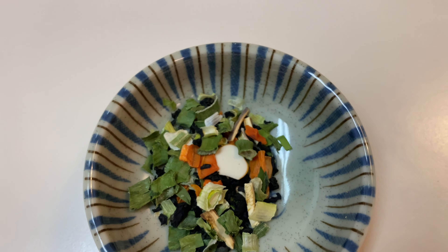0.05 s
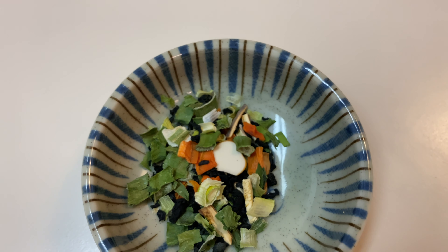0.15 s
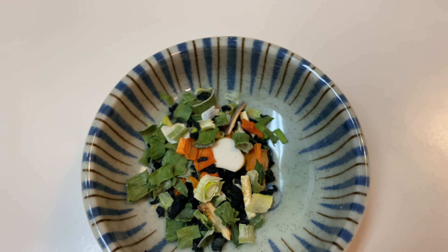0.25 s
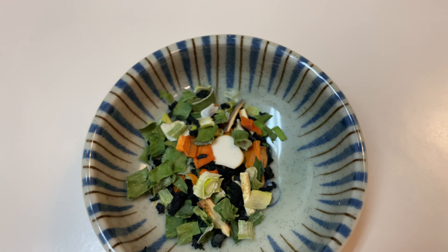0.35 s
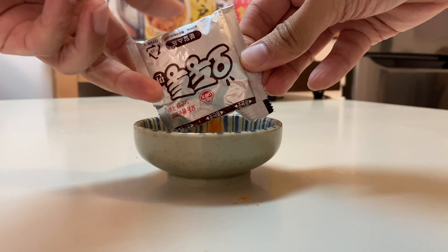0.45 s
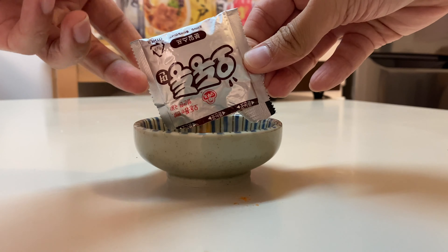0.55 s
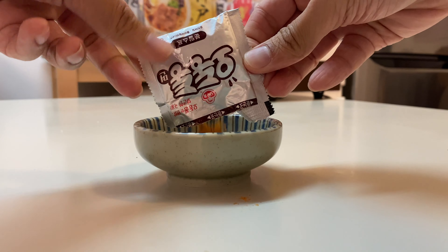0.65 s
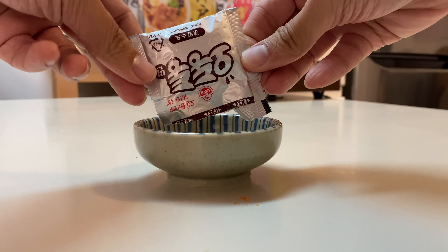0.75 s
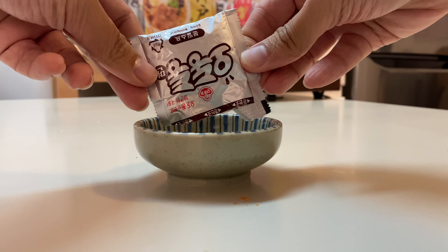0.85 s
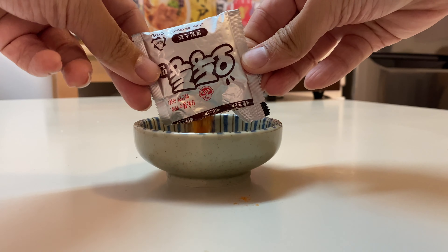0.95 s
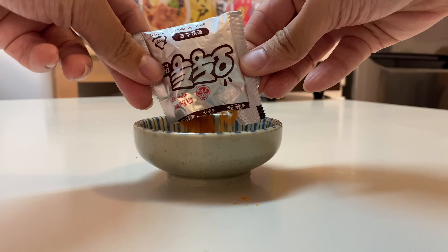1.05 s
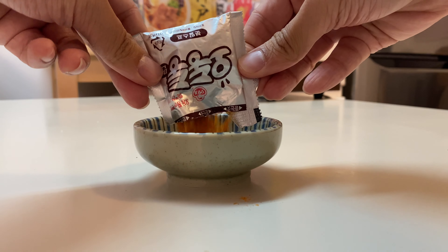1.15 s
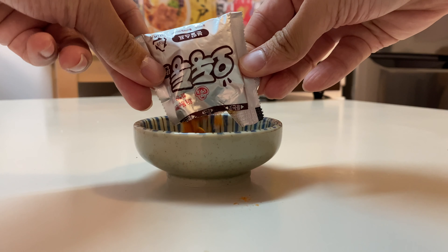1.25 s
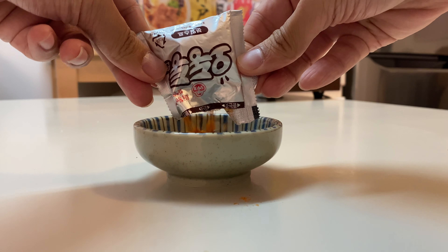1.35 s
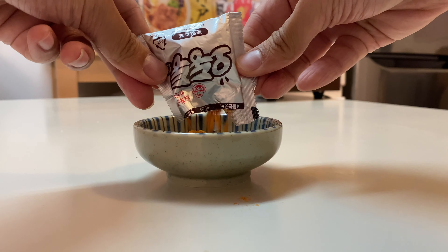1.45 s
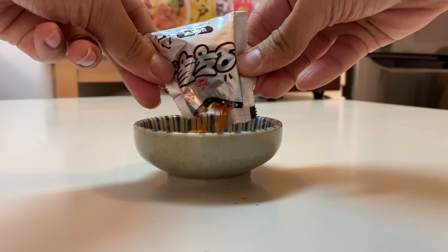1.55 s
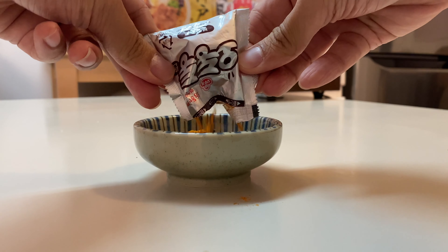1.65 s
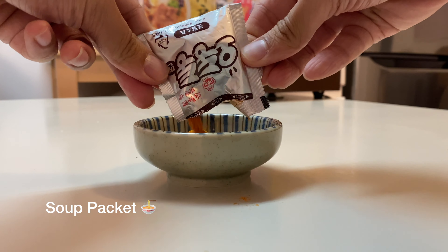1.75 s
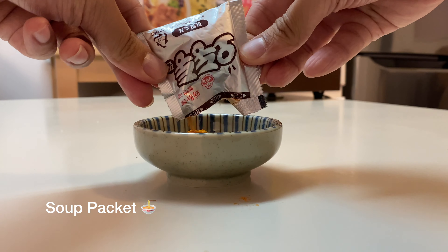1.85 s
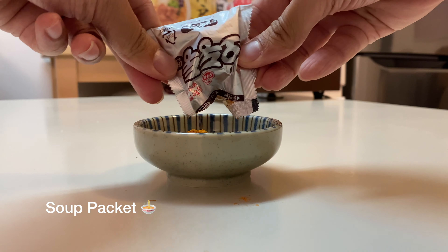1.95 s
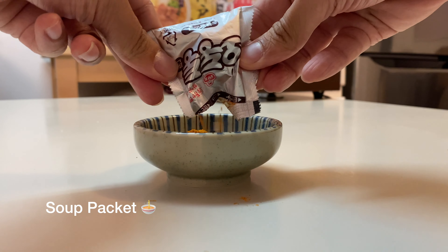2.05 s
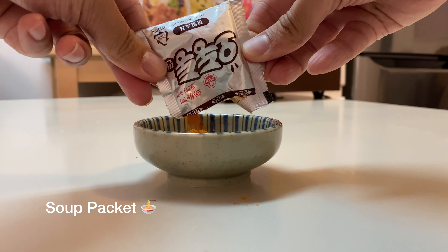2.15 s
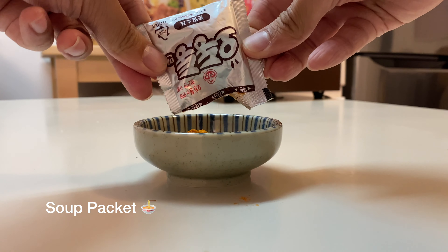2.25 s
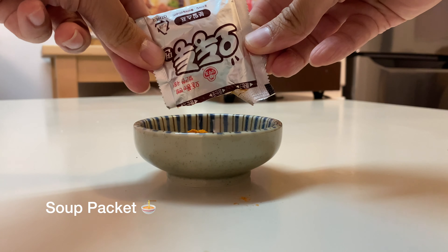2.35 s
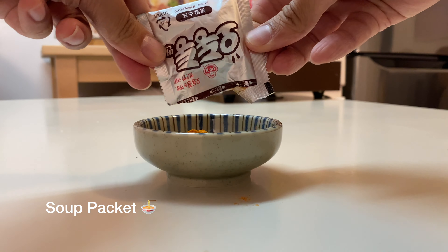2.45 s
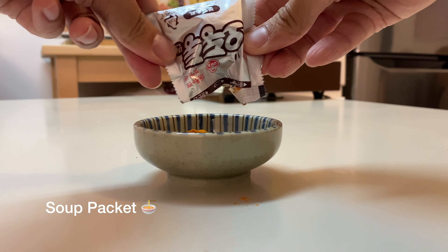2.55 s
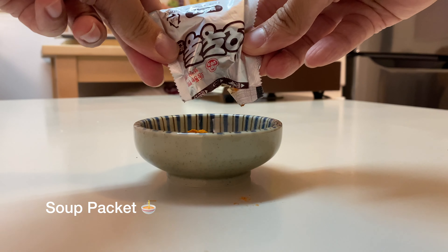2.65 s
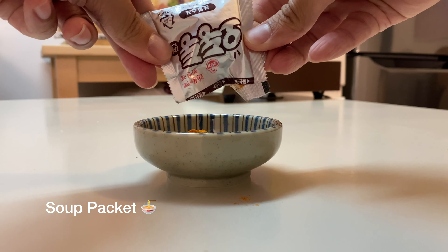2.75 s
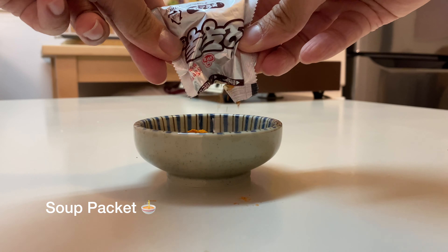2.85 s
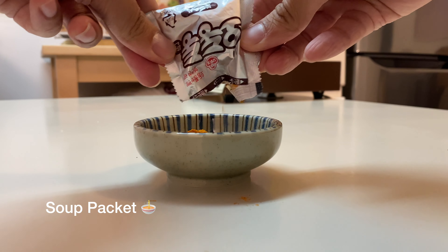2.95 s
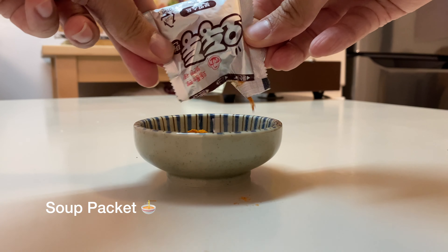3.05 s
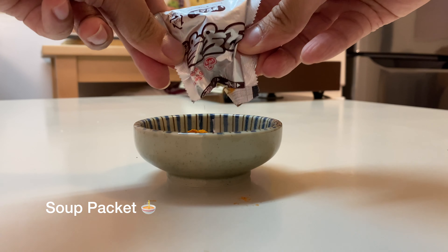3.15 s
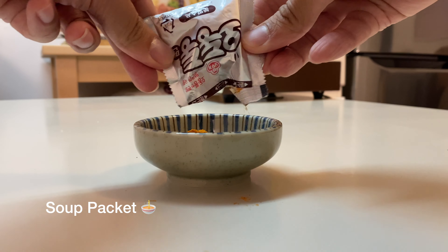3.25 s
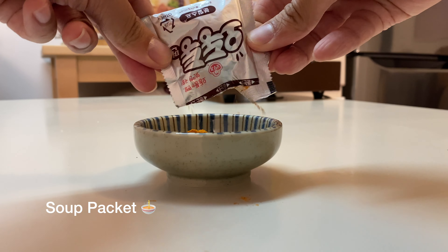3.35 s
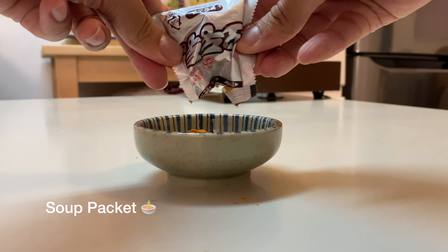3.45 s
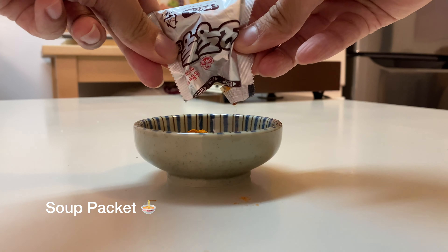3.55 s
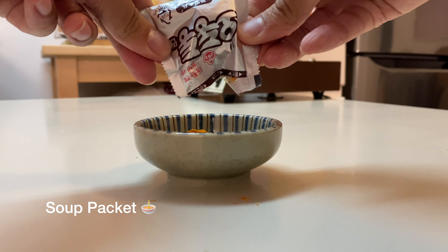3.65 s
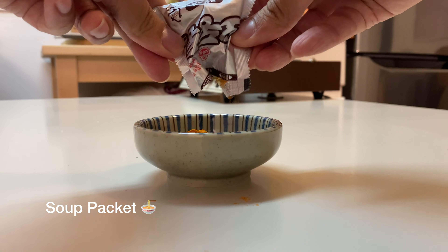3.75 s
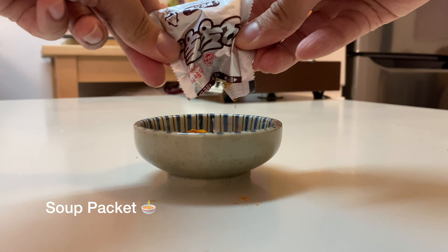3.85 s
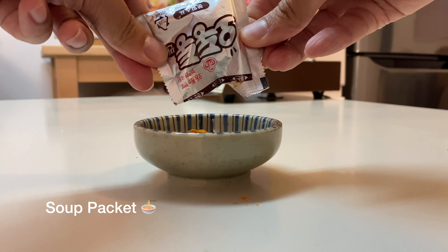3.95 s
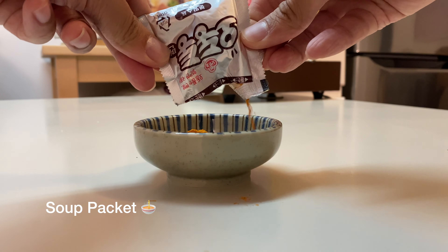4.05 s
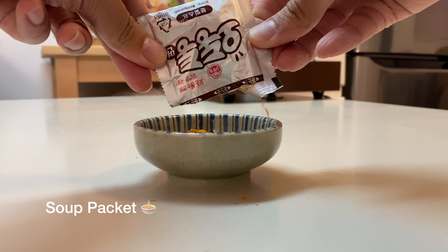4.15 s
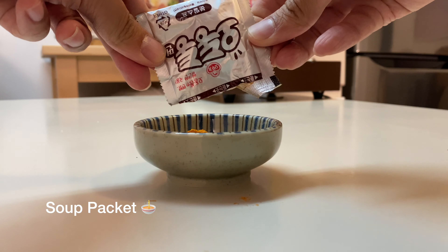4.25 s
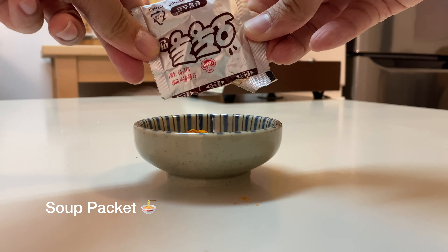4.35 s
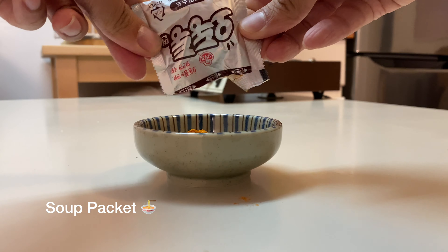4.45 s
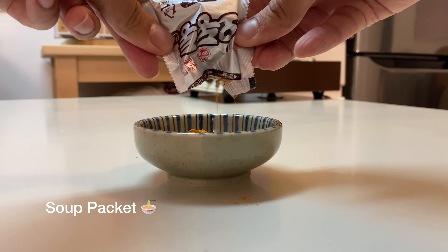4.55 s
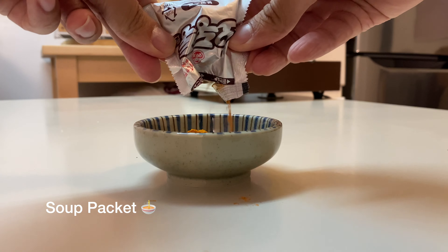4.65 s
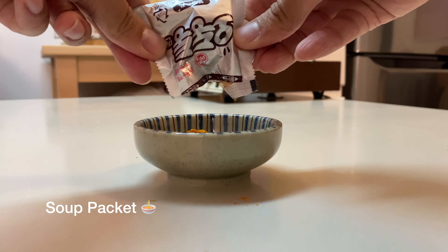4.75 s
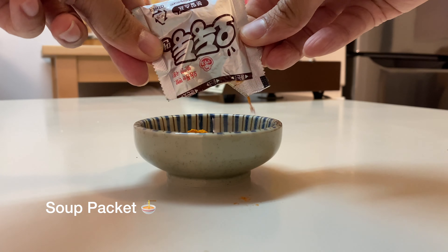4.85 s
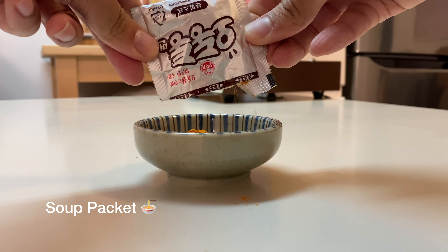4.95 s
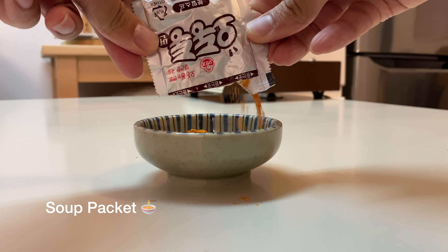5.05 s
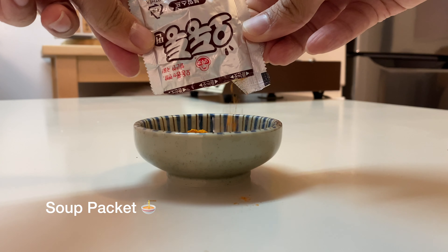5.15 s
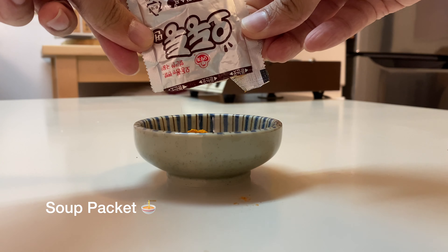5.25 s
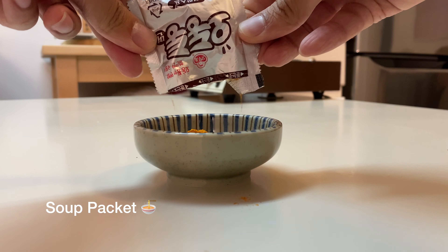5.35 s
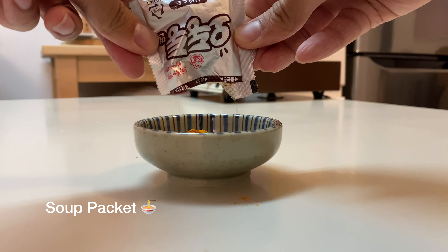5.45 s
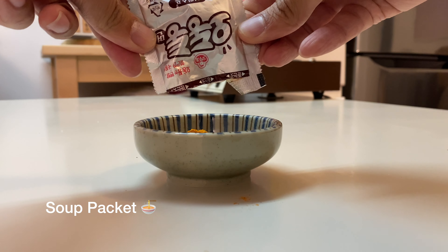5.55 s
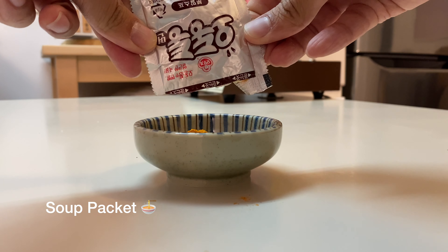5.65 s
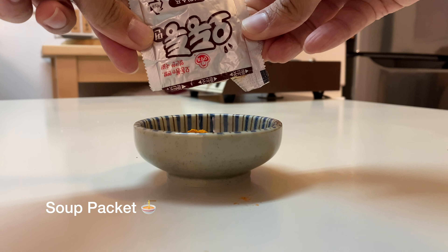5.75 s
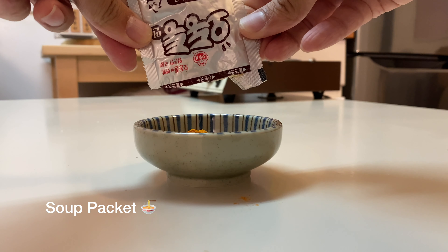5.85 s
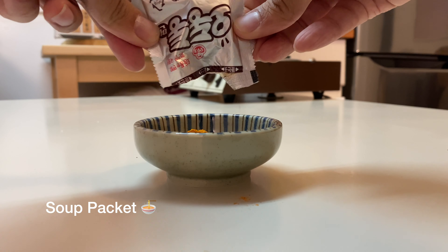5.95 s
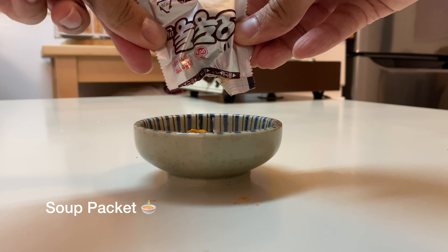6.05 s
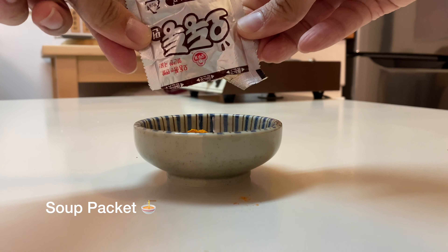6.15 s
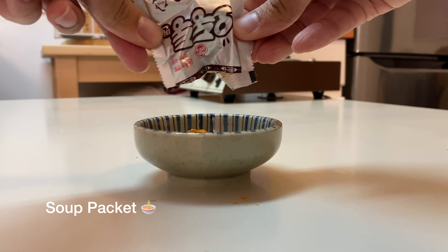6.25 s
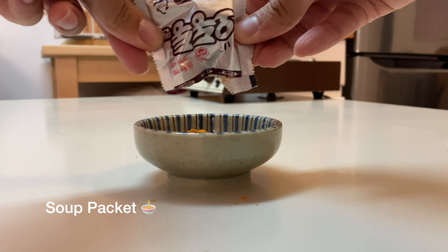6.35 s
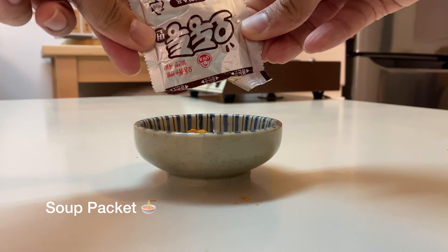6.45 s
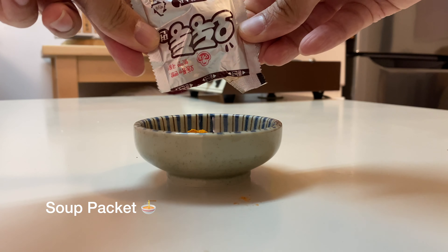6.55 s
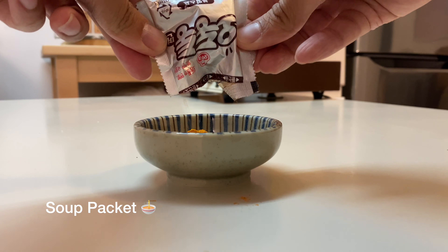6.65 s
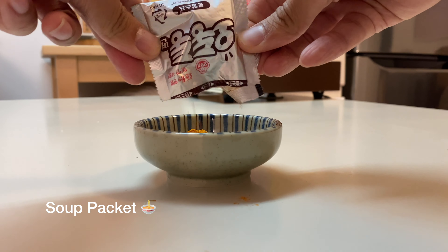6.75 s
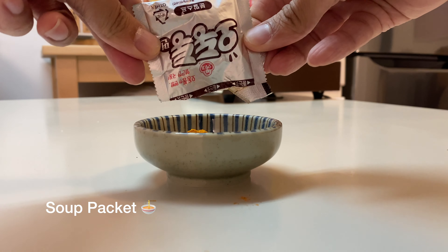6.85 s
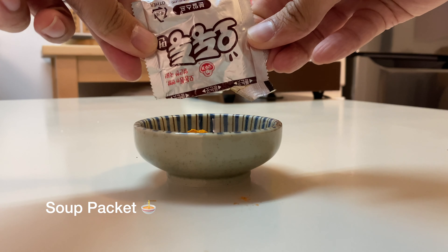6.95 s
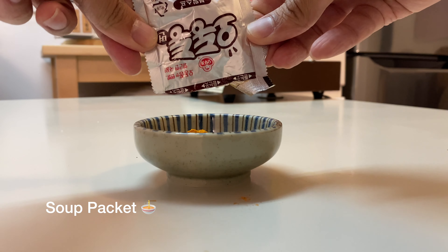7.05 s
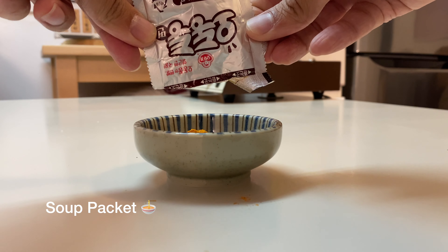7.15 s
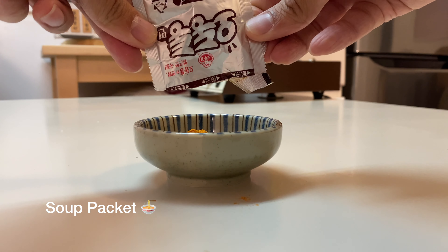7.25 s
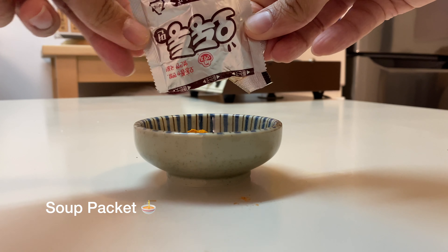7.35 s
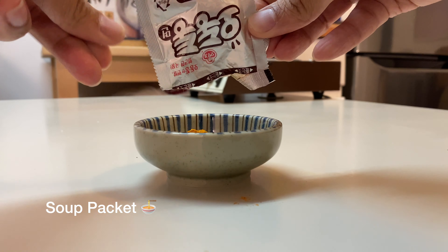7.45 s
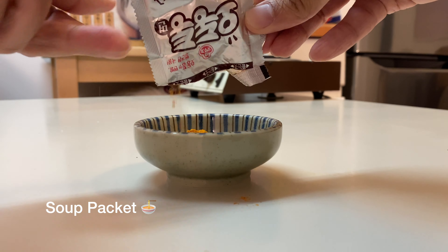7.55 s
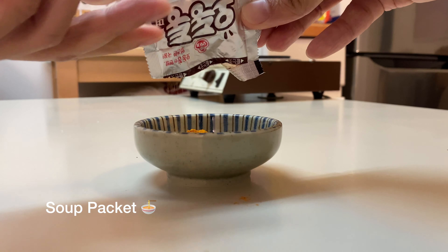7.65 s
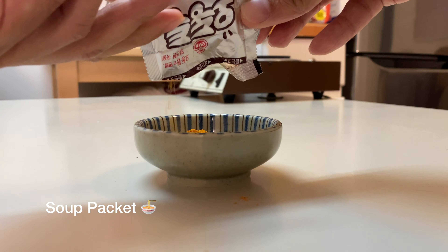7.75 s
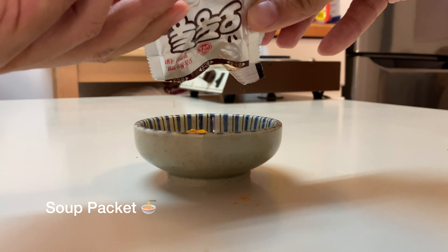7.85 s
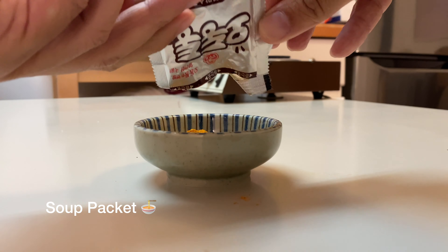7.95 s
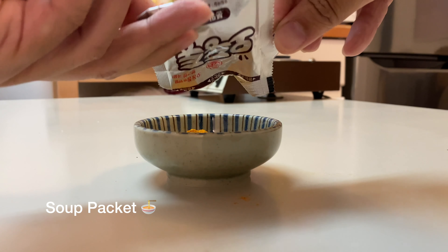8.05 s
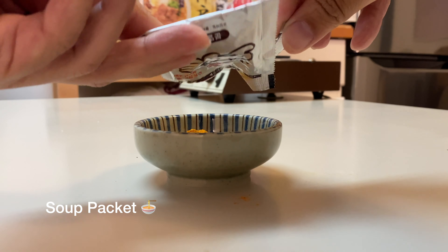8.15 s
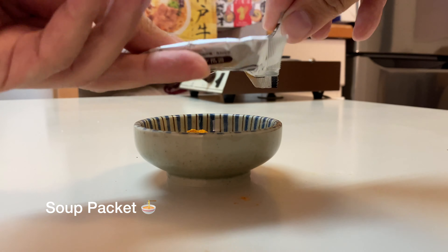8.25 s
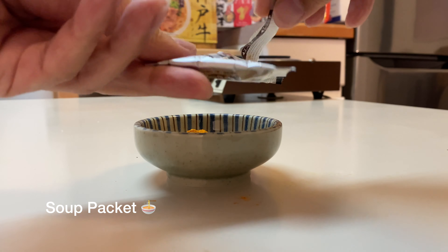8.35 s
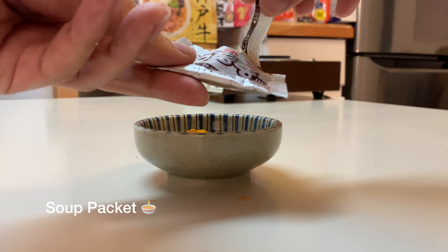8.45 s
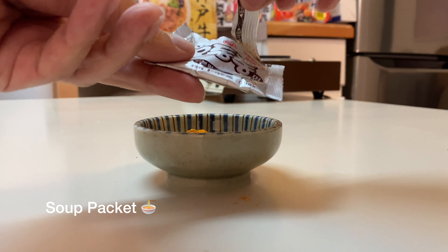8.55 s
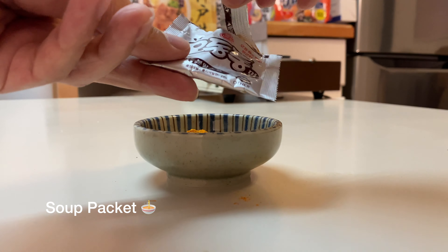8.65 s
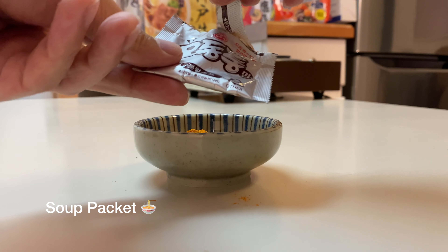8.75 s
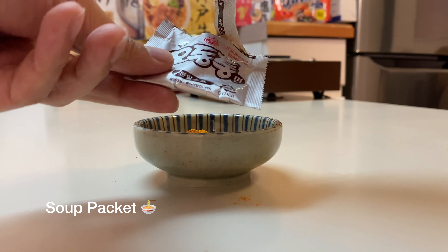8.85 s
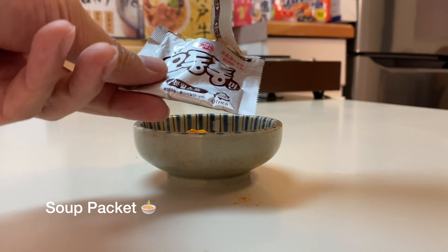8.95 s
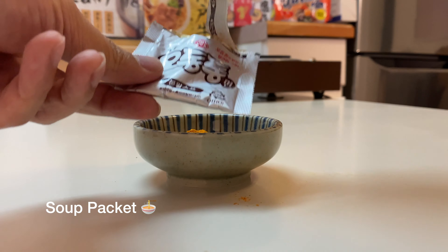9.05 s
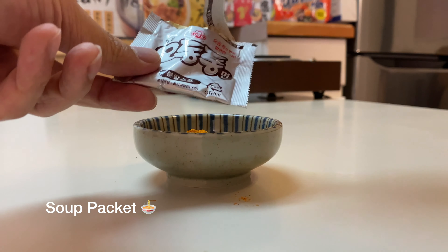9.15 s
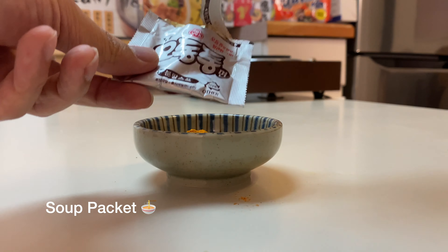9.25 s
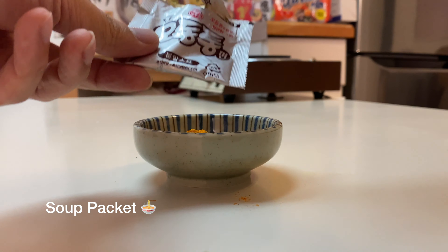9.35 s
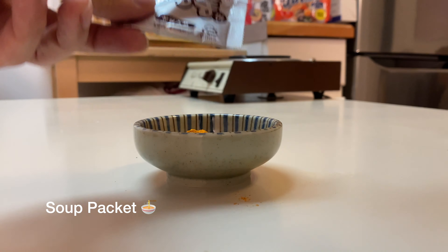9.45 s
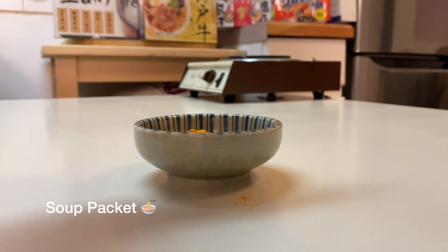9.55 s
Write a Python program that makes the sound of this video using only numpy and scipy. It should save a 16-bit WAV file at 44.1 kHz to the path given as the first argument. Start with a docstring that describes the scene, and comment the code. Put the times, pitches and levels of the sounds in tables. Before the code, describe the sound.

A faint appliance hum and a dull tick come first. Then a small foil-plastic seasoning sachet is squeezed and shaken close to the microphone, its creases crackling and snapping in uneven clusters. Powder and fingertips rustle on the film, and the pouch thumps softly as it pops in and out. Near the end the crinkling thins to a few weaker crackles. The kitchen adds a brief echo.

```python
"""First come a faint appliance hum and a dull tick, then sharp snaps: a foil-plastic seasoning sachet is
squeezed and shaken over a small dish. Its creases buckle and set the film ringing, and the tiled kitchen
answers briefly. Powder and fingertips rustle on the film, and the pouch thumps softly as it pops in or out.
Two microphone ports on a phone hear it with different colour and timing."""
import sys
import numpy as np
from scipy import signal
from scipy.fft import rfft, irfft, next_fast_len
from scipy.io import wavfile
from scipy.ndimage import map_coordinates

SR = 44100
rng = np.random.default_rng(int(sys.argv[2]) if len(sys.argv) > 2 else 0)


def output_pcm(signal):
    """Save a mono or channel-first signal as 16-bit PCM at the path in sys.argv[1].

    Samples are clipped to [-1, 1] before scaling.
    """
    pcm = np.clip(np.atleast_2d(signal).T, -1, 1) * 32767
    wavfile.write(sys.argv[1], SR, np.round(pcm).astype(np.int16))


N = 423360  # 9.6 s


def amp(db):
    """Turn decibels into a multiplier."""
    return 10 ** (np.asarray(db) / 20)


def unit(x):
    """Scale each channel to an average power of 1."""
    return x / np.sqrt(np.mean(x ** 2, axis=-1, keepdims=True) + 1e-20)


def along(points, hz):
    """Read between (frequency, value) points on a logarithmic frequency scale."""
    f, values = np.transpose(points)
    return np.interp(np.log(hz + 1), np.log(f + 1), values)


def curves(rows):
    """Turn each column after the time into one value per sample."""
    times, *columns = np.transpose(rows)
    return [np.interp(np.arange(N) / SR, times, column) for column in columns]


def filtered(x, response):
    """Scale and delay each frequency of x as response(hz) says."""
    size = next_fast_len(2 * x.shape[-1])
    return irfft(rfft(x, size) * response(np.fft.rfftfreq(size, 1 / SR)), size)[..., :x.shape[-1]]


def ringing(modes):
    """A filter that rings at each (f/Hz, width/Hz, level/dB)."""
    return lambda f: sum((-1) ** k * amp(db) * 1j * f * width / (hz * hz - f * f + 1j * f * width)
                         for k, (hz, width, db) in enumerate(modes))


def coloured(spectrum, channels):
    """Noise of power 1, shaped by (f/Hz, level/dB) points."""
    return unit(filtered(rng.standard_normal((channels, N)), lambda hz: amp(along(spectrum, hz))))


def wobble(rate):
    """A smooth curve through `rate` random values a second."""
    return map_coordinates(rng.standard_normal(int(N * rate / SR) + 4), [np.arange(N) * rate / SR])


def placed(seconds, sounds):
    """Add each row of sound at its start time."""
    at = np.round(seconds * SR).astype(int) + np.arange(sounds.shape[1])
    return np.bincount(at.ravel(), sounds.ravel(), N + sounds.shape[1])[:N]


# How loud the background sounds as the phone's automatic gain dips and rises:
# t/s, room tone level/dB, rumble level/dB
BACKGROUND_LEVELS = [(0.0, -72.5, -75.5), (0.46, -69.5, -68.5), (0.48, -76, -80), (1.4, -74, -79.5),
                     (3.2, -71, -85), (4.7, -68.5, -78.5), (5.3, -61, -70.5), (6.4, -61, -68),
                     (7.2, -64.5, -71.5), (8.9, -63.5, -70), (9.6, -70, -68.5)]
ROOM_TONE_COLOUR = [(80, -22), (140, -2.5), (210, -4.5), (300, -6), (470, -8.5), (530, -13), (640, -9.5),
                    (760, -23), (1100, -40), (1500, -79.5)]  # the room's low murmur: f/Hz, relative level/dB
RUMBLE_COLOUR = [(15, -40.5), (30, -10), (60, 0), (100, -3), (170, -43.5)]  # its deepest noise: f/Hz, relative level/dB
STEREO_LIKENESS = [(60, 0.93), (300, 0.16), (700, 0.12)]  # how alike left and right are: f/Hz, likeness (1 = the same)
HUM_NOTES = [(237, -72.5), (479, -82.5)]  # the appliance: f/Hz, level/dB when the room tone is at -68.5 dB
HISS_COLOUR = [(500, -30.5), (900, 3), (3000, -11), (9000, -17), (12500, -22.5), (14000, -33.5)]  # microphone hiss: f/Hz, relative level/dB


def kitchen():
    """An appliance hums over low room tone, rumble and microphone hiss."""
    t = np.arange(N) / SR
    tone_db, rumble_db = curves(BACKGROUND_LEVELS)
    air = amp(tone_db + 2.1 * wobble(6.8)) * coloured(ROOM_TONE_COLOUR, channels=2)
    air += amp(rumble_db + 1.3 * wobble(4)) * coloured(RUMBLE_COLOUR, channels=2)
    spread = lambda hz: np.arccos(along(STEREO_LIKENESS, hz)) / 2
    shared, opposed = filtered(air, lambda hz: np.array([np.cos(spread(hz)), np.sin(spread(hz))]))
    swell_db = 0.58 * (tone_db + 68.5)  # the hum rises and falls with the room tone
    hum = sum(amp(db + swell_db + 2 * wobble(2.3)) * np.sin(2 * np.pi * hz * t + .6 * wobble(2.7))
              for hz, db in HUM_NOTES)
    background = (np.array([shared + opposed, shared - opposed]) + hum) * amp([[1.2], [-1.2]])
    return background + amp(-79) * coloured(HISS_COLOUR, channels=2)


# A faint, dull tick at the start, then the sachet's creases snapping:
# t/s, crack level/dB, panel level/dB, panel f/Hz, pouch level/dB.
# A panel is a flat patch of film. Panel and pouch levels are relative: they follow the crack's.
TICK_AND_SNAPS = [(0.0497, -72.5, 28, 900, 11), (0.4812, -50.5, -9, 1440, -11),
                  (0.5406, -49, -10, 1680, -15), (0.5619, -48.5, 1, 1750, -15),
                  (0.58, -49, -1.5, 1440, -14), (0.7243, -64.5, 7, 1180, -5),
                  (0.749, -52.5, -7.5, 930, -10.5), (0.7853, -51, -3, 2370, -9.5),
                  (0.9806, -23.5, 9.5, 2120, -6.5), (0.9956, -24, 9, 2110, -9.5),
                  (1.0279, -13, -15.5, 1720, -28.5), (1.0559, -27, 11.5, 2140, -7),
                  (1.2019, -46, 1, 980, -15), (1.2367, -52.5, -4, 960, -16), (1.273, -56.5, -8, 2310, -16),
                  (1.4351, -20.5, 9.5, 870, -2), (1.4539, -12, -6.5, 980, -19),
                  (1.4627, -18, -7, 830, -13.5), (1.4761, -20.5, 11.5, 960, 3.5),
                  (1.4973, -32.5, 12, 1400, -2.5), (1.5056, -24, 0, 920, -2),
                  (1.5122, -7.5, -7.5, 1220, -28), (1.5229, -22, 6, 1070, 5.5), (1.529, -30.5, 8, 1140, -5),
                  (1.5409, -26.5, 3, 1350, -10), (1.669, -24.5, 7, 1160, -14.5),
                  (1.7035, -22.5, -4.5, 2230, -22.5), (1.7727, -33, 9.5, 1090, 9.5),
                  (1.8042, -17.5, -6, 1230, -18), (1.8139, -20.5, -2, 2140, -5),
                  (1.8504, -14.5, 2, 2110, -21), (1.886, -13.5, -9.5, 2120, -24),
                  (1.8919, -21.5, 1.5, 1310, -9), (2.0716, -41.5, 13.5, 1120, -4.5),
                  (2.0971, -18, -3, 1720, -15), (2.1043, -32, -3, 1180, -8), (2.3088, -35, 14, 1020, -0.5),
                  (2.3181, -15.5, -1.5, 2380, -17), (2.3396, -15, 8, 830, -3), (2.4588, -9, -5, 1070, -6.5),
                  (2.506, -27.5, 11, 1080, -1.5), (2.5231, -21.5, 5, 990, -8.5),
                  (2.549, -14, 7.5, 1370, -21.5), (2.7, -39, 16, 1160, -4), (2.7345, -30, 10, 1280, -8),
                  (2.7796, -24.5, 3.5, 1500, -10), (2.8845, -17.5, -3.5, 1400, -14),
                  (2.8951, -20, -6, 1360, -23), (2.942, -24, 2, 1250, -2.5), (3.0898, -4, -2, 2190, -15.5),
                  (3.0969, -15.5, -3.5, 2690, -12.5), (3.2104, -13, 0.5, 2350, -2),
                  (3.217, -19.5, 1, 1080, -2.5), (3.258, -21.5, -3.5, 1290, -11.5),
                  (3.2652, -19.5, 9.5, 1080, -8.5), (3.2715, -26, 1.5, 1540, -3.5),
                  (3.3446, -15, 2, 2190, -13), (3.361, -23, -2, 2200, -15), (3.3898, -18.5, 8, 1770, -5),
                  (3.4033, -4, -16, 1670, -18.5), (3.4149, -16.5, -2.5, 1110, -16),
                  (3.5036, -35.5, 15, 1350, -2.5), (3.6023, -15.5, 1, 1280, 5),
                  (3.6739, -15.5, -13, 1410, -22), (3.6896, -16.5, 3, 2290, 2), (3.7032, -32, 8, 1300, 1.5),
                  (3.7329, -36, 6.5, 2190, 7.5), (3.828, -47.5, 21.5, 1060, 5),
                  (3.8364, -48, 21, 1460, 18.5), (3.8438, -28, -2, 1130, -9),
                  (3.8579, -27, 3.5, 1560, -13.5), (3.8725, -21, 2.5, 1000, 9.5),
                  (3.8834, -32.5, 0.5, 930, -6.5), (3.8946, -20.5, -5.5, 1060, -16),
                  (3.904, -32.5, -2, 1110, -13), (4.049, -14.5, 4.5, 1260, -9.5),
                  (4.0921, -17.5, -4.5, 1770, -8.5), (4.2915, -33, 17, 830, 12.5),
                  (4.3162, -17.5, 0, 1040, -15.5), (4.402, -25, 3, 970, -10), (4.4379, -8.5, -4, 2690, -10),
                  (4.4454, -19, 3.5, 2130, -19.5), (4.484, -21, 4, 2270, -35),
                  (4.5217, -9, -0.5, 2230, -6.5), (4.539, -25.5, 2, 2160, -12.5),
                  (4.6033, -40.5, 17, 1120, 10.5), (4.7125, -32.5, 12, 2110, 10),
                  (4.7216, -31.5, 15, 1300, 15), (4.7295, -14, 2.5, 1540, -3), (4.7498, -18, -1, 1430, -11),
                  (4.7671, -28, 1, 1220, -14.5), (4.7921, -30, 6, 1210, -12), (4.9283, -13, 0, 830, -4.5),
                  (4.9505, -3, -7.5, 1220, -7), (4.9599, -11.5, -16, 890, -15.5),
                  (5.1367, -43, 2, 960, -10), (5.2803, -6.5, -10, 2200, -31), (5.2896, -21, -17, 2530, -32),
                  (5.3289, -20.5, 4.5, 850, -7), (5.34, -29.5, 14.5, 990, 6),
                  (5.3472, -16.5, -3, 1130, -19), (5.3609, -34.5, 13, 960, 4), (5.3731, -23, 4, 1420, -7),
                  (5.385, -30, -2.5, 900, -17.5), (5.4378, -31, 11.5, 1170, -17),
                  (5.4652, -30.5, 7.5, 1020, -2.5), (5.588, -16, -4.5, 1010, -25),
                  (5.6126, -14, 2, 990, -5.5), (5.6211, -28, 6.5, 1150, -2.5),
                  (5.8663, -12.5, -6, 1130, -16.5), (5.8748, -11.5, -4.5, 1060, -18),
                  (5.8884, -20.5, -5, 1250, -4), (5.894, -20.5, 2.5, 1430, -4.5),
                  (5.91, -18, 1, 2200, -4.5), (5.9163, -19.5, -2, 1540, -5), (5.9252, -6, -6.5, 1280, -9),
                  (5.9335, -19.5, -6.5, 830, 0), (5.9516, -19, 1, 1990, -16.5),
                  (6.083, -21.5, 4, 1120, -20.5), (6.0908, -16.5, -6.5, 1340, -25),
                  (6.1042, -36.5, 5, 830, 0), (6.1123, -30.5, 8, 830, 1), (6.121, -39, 10, 1210, -1),
                  (6.1622, -26, 1, 1460, -16.5), (6.18, -24, 4.5, 1080, -20),
                  (6.1974, -16.5, 1.5, 2330, -19.5), (6.2487, -9, -7.5, 920, -15),
                  (6.2629, -8.5, -4.5, 1570, -14), (6.3143, -4.5, -13.5, 990, -23),
                  (6.3259, -19, 3, 1220, -2), (6.3496, -16, 1, 1030, -10), (6.3817, -5.5, -8.5, 890, -6),
                  (6.4889, -19.5, -2.5, 2350, -7), (6.5008, -14, -4.5, 1100, -23.5),
                  (6.5193, -19, 4.5, 1000, -16), (6.5465, -21, 5, 2160, -15),
                  (6.5554, -22, -7, 2190, -17.5), (6.5723, -16, -5.5, 2300, -15),
                  (6.5818, -7.5, -10, 980, -18), (6.6036, -15, -4.5, 1060, -8.5),
                  (6.6306, -12, -5, 1430, -25), (6.7317, -20.5, -0.5, 1810, -21),
                  (6.7431, -21.5, 0.5, 1300, -13), (6.8833, -25.5, 8.5, 830, -4),
                  (6.9234, -5, -9, 1110, -12.5), (7.1911, -38.5, -0.5, 2360, -8),
                  (7.2999, -28.5, 8, 830, 0), (7.3843, -18.5, -5, 830, -18.5), (7.3931, -31, -1, 830, -3),
                  (7.6082, -36, -13.5, 1320, -14), (7.6154, -34, 1.5, 1310, -10),
                  (7.7367, -31, -9.5, 1320, -5), (7.748, -37.5, 2, 1360, 5), (7.7576, -34, -5.5, 1310, -8),
                  (7.8591, -31, -3, 830, -8.5), (7.8914, -43, 1.5, 1240, -2), (7.991, -52.5, 0, 2690, 2),
                  (8.0337, -51, -2, 1210, -3), (8.0394, -52.5, -1, 1260, -5), (8.0593, -47.5, -1, 1200, -2),
                  (8.2417, -23.5, -13.5, 1200, -18), (8.2926, -30, -29, 850, -32),
                  (8.5441, -30, -2, 1150, -15), (8.5667, -21.5, -2, 2670, -11), (8.682, -37, 6, 1360, 4.5),
                  (8.8511, -57.5, 11, 1020, 14), (8.8694, -56, 8, 1060, 3), (8.8981, -50.5, 2, 890, 2),
                  (8.9067, -48.5, 3, 830, -5), (8.9357, -55.5, 2, 830, 10)]


def snap_list():
    """Give the tick and each snap two followers, usually weaker, as when neighbouring creases buckle."""
    leaders = np.array(TICK_AND_SNAPS, float)
    gap, crack, panel, pitch, pouch = np.moveaxis(rng.standard_normal((len(leaders), 2, 5)), -1, 0)
    wait_s = np.cumsum(.012 * np.exp(0.6 * gap), axis=1)
    shift_hz = 0.34 * leaders[:, None, 3] * np.tanh(pitch)
    changes = np.stack([wait_s, -16.5 + 5.5 * crack, 4 * panel, shift_hz, 5 * pouch], axis=-1)
    followers = leaders[:, None] + changes
    return np.vstack([leaders, followers.reshape(-1, 5)])


EDGE_RINGS = [(8620, 650, 7), (11300, 2400, -9), (15500, 900, -5.5)]  # the crease itself ringing: f/Hz, width/Hz, relative level/dB
POUCH_PITCH = [(1.4, 640), (4.9, 605), (5.6, 532), (6.4, 541), (7, 533), (9, 584)]  # the hollow pouch's note as the grip shifts: t/s, f/Hz
BURST_S, FACET_HZ = .008, 4363  # typical length of a full-strength burst; typical pitch of the crack


def snaps():
    """A dull tick, then snaps: spiky bursts that ring a tiny facet, the crease, a panel and the pouch."""
    start, db, panel_db, panel_hz, pouch_db = snap_list().T[:, :, None]
    t = np.arange(1024) / SR
    jitter, spikes = rng.standard_normal((len(start), 2, len(t))).swapaxes(0, 1)
    pitch_luck, edge_luck, length_luck = spikes[:, -3:].T[:, :, None]  # no two creases are alike
    facet_hz = FACET_HZ * np.exp(.25 * pitch_luck)
    pouch_hz = np.interp(start, *np.transpose(POUCH_PITCH)) * np.exp(0.046 * spikes[:, :1])
    edge_db = -8.5 + 5.5 * edge_luck
    length = BURST_S * np.exp(0.26 * length_luck - .02 * db)  # weaker snaps last longer
    fade = (1 - np.exp(-t / (0.016 * length))) * amp(-60 * t / np.clip(length, .002, .04))
    burst = fade * jitter * amp(2.53 * spikes)  # the crease gives way in many tiny jumps
    shove = fade * (1 + 0.072 * jitter)  # the wall moves one way, so the pouch gets one push

    # A small panel gives off no bass, and rings little above its lowest notes.
    bass_cut = lambda f: (1j * f / 420 / (1 + 1j * f / 420)) ** 2
    treble_cut = lambda f: 1 / (1 + 1j * f / (2.73 * panel_hz)) ** 2
    facet_ring = ringing([(facet_hz, 0.37 * facet_hz, 0), (5200, 4500, -6)])
    panel_ring = ringing([(panel_hz, 0.45 * panel_hz, 0), (1.906 * panel_hz, 0.28 * panel_hz, -7),
                          (0.92 * panel_hz, 0.65 * panel_hz, -8)])
    pouch_ring = ringing([(pouch_hz, 230, 0)])
    crack = filtered(burst, lambda f: bass_cut(f / 3) * facet_ring(f))
    edge = filtered(burst, ringing(EDGE_RINGS))
    panel = filtered(burst, lambda f: bass_cut(f) * panel_ring(f) * treble_cut(f))
    pouch = filtered(shove, lambda f: bass_cut(f) * pouch_ring(f) ** 2)
    parts = [(crack, -0.26), (edge, edge_db), (panel, panel_db + 0.22), (pouch, pouch_db - 4)]
    sound = sum(amp(peak_db) * part / np.abs(part).max(axis=1, keepdims=True) for part, peak_db in parts)
    return placed(start, amp(db) * sound)


ECHO_TIMES = [(200, 0.28), (1400, 0.21), (4500, 0.43), (12000, 0.14)]  # the tiled room's echo: f/Hz, t/s to fade by 60 dB


def room_echo(x):
    """Each frequency of the echo dies at its own speed; every stretch of sound gets a new tail."""
    out, step = np.zeros((2, N + SR)), 8192
    for start in range(0, N, step):
        hz, t, noise = signal.stft(rng.standard_normal((2, SR // 3)), SR, nperseg=256)
        fade = amp(-60 * t / along(ECHO_TIMES, hz)[:, None]) * np.clip(t / 0.0025, 0, 1)
        tail = signal.istft(noise * fade, SR, nperseg=256)[1]
        echo = signal.fftconvolve(x[None, start:start + step], tail / np.linalg.norm(tail[0]), axes=1)
        out[:, start:start + echo.shape[1]] += echo
    return out[:, :N]


def powder_motion():
    """The power of the moving powder: each main snap jolts it, then it settles."""
    start, db, panel_db = np.transpose(TICK_AND_SNAPS)[:3, :, None]
    t, settle_s = np.arange(SR // 4) / SR, 0.19
    jolt = amp(2 * db) + amp(2 * (db + panel_db))
    return placed(start, jolt * amp(-2 * 60 * t / settle_s))


FINGER_RUBS = [(0.44, -84.5, -81.5), (1.07, -47, -59), (1.23, -63, -75.5), (1.48, -67, -78),
               (1.65, -54.5, -58), (2.25, -66.5, -63.5), (2.54, -51, -51.5), (2.9, -57, -52),
               (3.26, -48, -49), (4.18, -69, -62), (4.51, -61.5, -56.5), (5.26, -62, -60),
               (5.46, -61, -52.5), (5.77, -69.5, -62), (6.4, -49.5, -50), (7.12, -74, -68.5),
               (7.53, -62.5, -73.5), (7.89, -64, -67.5), (8.11, -75.5, -74.5), (8.54, -68.5, -78.5),
               (8.76, -64, -65), (9.1, -74, -80)]  # fingers on the film: t/s, bright base level/dB, dull base level/dB
BRIGHT_COLOUR = [(2000, -33.5), (3200, -3), (4400, -5), (5200, -2.5), (7200, -6), (10000, -8), (14000, -12),
                 (15700, -13.5), (16300, -33)]  # the high part of the rustle: f/Hz, relative level/dB
DULL_COLOUR = [(300, -29.5), (600, 2), (1100, -1.5), (1500, -6.5), (2200, -8), (3000, -7), (4500, -39.5)]  # the low part of the rustle: f/Hz, relative level/dB


def rustle():
    """Powder and fingertips hiss on the film in small lumps, with stray crackles on top."""
    powder = powder_motion()
    bright_rub_db, dull_rub_db = curves(FINGER_RUBS)
    bright_db = 10 * np.log10(amp(2 * bright_rub_db) + amp(2 * -43.5) * powder)  # powers add up
    dull_db = 10 * np.log10(amp(2 * dull_rub_db) + amp(2 * -35.5) * powder)
    moving = np.interp(np.arange(N) / SR, [.465, .475, 8.95, 9.05], [0, 1, 1, 0])
    effort = np.clip((dull_db + 68.5) / 18, 0, 1)
    lumps = unit(amp(effort * (2.6 * wobble(54) + 1.6 * wobble(320)) + 5.2 * wobble(25)))
    bright = amp(bright_db) * coloured(BRIGHT_COLOUR, channels=1)[0]
    dull = amp(dull_db + 3) * coloured(DULL_COLOUR, channels=1)[0]
    return moving * (lumps * (bright + dull) + crackle(effort, level_db=dull_db + 5))


def crackle(effort, level_db):
    """Tiny folds tick at random, more often the harder the film is handled; each has its own pitch."""
    at = np.flatnonzero(rng.random(N) < 700 * effort / SR)  # about 700 a second at full effort
    pitch_luck, level_luck = rng.standard_normal((N // 40 + 1, 2))[at // 40].T[:, :, None]
    t = np.arange(200) / SR
    hz = np.clip(2200 * np.exp(0.52 * pitch_luck), 500, 14000)
    fade_db = -60 * t * hz / 7  # gone in seven cycles
    tick = amp(level_db[at, None] + 6 * level_luck + fade_db) * np.sin(2 * np.pi * hz * t)
    return placed(at[:, None] / SR, tick)


POUCH_POPS = [(1.436, -34, 225), (1.476, -38.5, 170), (1.521, -44, 250), (2.459, -44.5, 329.6),
              (2.551, -47, 290), (3.091, -51.5, 262), (3.405, -38.5, 244), (3.597, -47.5, 330),
              (3.691, -35, 267), (3.869, -54.5, 330), (4.084, -39, 233.6), (4.434, -39, 332),
              (4.519, -49, 330), (4.948, -35.5, 205.7), (5.328, -42.5, 172), (5.371, -36, 328),
              (5.611, -30, 317), (5.866, -43, 335), (5.92, -38, 322), (6.32, -46.5, 220),
              (6.35, -47.5, 290), (6.387, -36.5, 121.6), (6.483, -40, 259), (6.52, -50, 256),
              (6.583, -40.5, 241), (6.923, -34.5, 143), (7.297, -44, 268), (7.372, -49.5, 79.3),
              (7.767, -49.5, 89), (8.563, -47.5, 243)]  # the pouch popping in or out: t/s, relative level/dB, final f/Hz


def thumps():
    """The squeezed pouch pops and pumps air: a couple of soft cycles that sag in pitch."""
    start, db, hz = np.transpose(POUCH_POPS)[:, :, None]
    cycles = np.arange(2048) / SR * hz
    swell = cycles * np.exp(1 - cycles / 0.69)
    bend = .5 * (1 - np.exp(-cycles / 0.25))
    return placed(start, amp(db + 5.5) * swell * np.sin(2 * np.pi * (cycles + bend)))


RIGHT_SHADE = [(100, -6), (500, -14), (700, -4), (1150, -32), (1500, -7.5), (2000, -7.5), (2600, 5.5),
               (3500, 3.5), (4400, -12.5), (5800, -2.5), (7000, -9), (8600, -1), (9500, -1)]  # how the phone body colours the right port: f/Hz, level/dB over the left
RIGHT_LAG = [(0, .4), (350, 1.1), (520, 1.5), (780, 3), (1200, 1.5), (1900, 3), (2050, 1.1), (2500, 1.7),
             (2750, 3.1), (3200, 3.8), (3600, 5.3), (4300, 6.2), (4500, 4.3), (6200, 4.2), (6500, 7.4),
             (7700, 5.6), (8100, 4.2), (9000, 3.6), (9800, 2.1), (11200, 0), (13300, -3.1), (14500, -5.3),
             (15500, -6.3)]  # how far the right port is behind the left: f/Hz, lag/radians


def microphone_ports(x):
    """A near sound reaches the left port directly and the right port round the phone body."""
    f, lag = np.transpose(RIGHT_LAG)
    right = filtered(x, lambda hz: amp(along(RIGHT_SHADE, hz)) * np.exp(-1j * np.interp(hz, f, lag)))
    return np.array([x, right])


def scene():
    """The close sounds, the echo of the clicks and the kitchen behind them."""
    clicks = snaps()
    close = microphone_ports(clicks + thumps() + rustle())
    return close + amp([[-13], [-16]]) * room_echo(clicks) + kitchen()


def record(dry):
    """The loudest peaks are rounded off, and nothing is kept above 16900 Hz."""
    rounded = dry / (1 + np.abs(dry / .9) ** 4) ** (1 / 4)
    return filtered(rounded, lambda hz: hz < 16900)


dry = scene()
out = record(dry)
output_pcm(out)
```